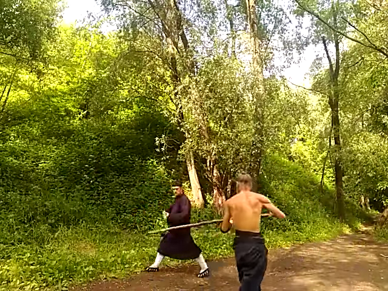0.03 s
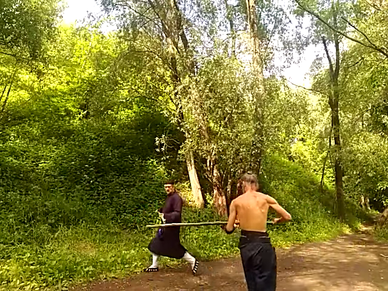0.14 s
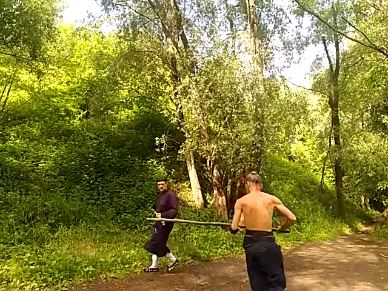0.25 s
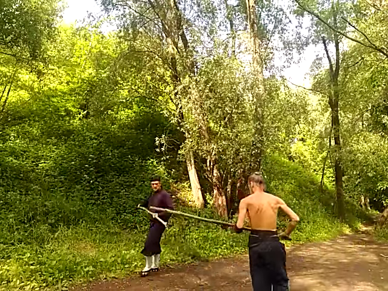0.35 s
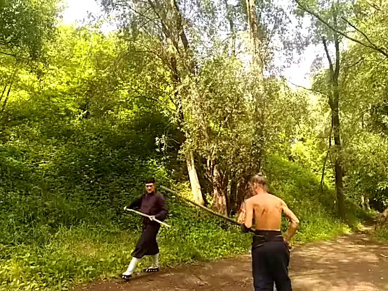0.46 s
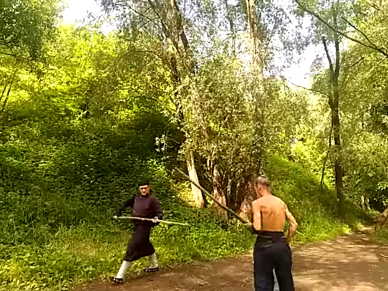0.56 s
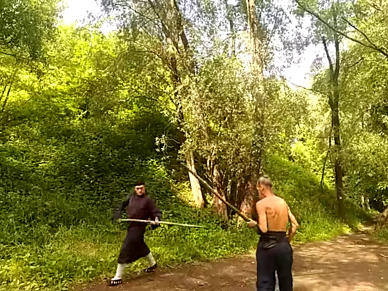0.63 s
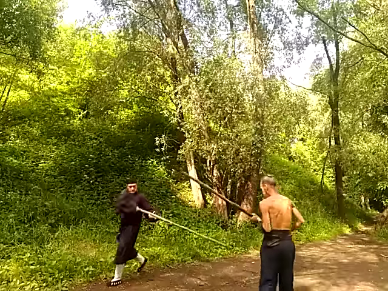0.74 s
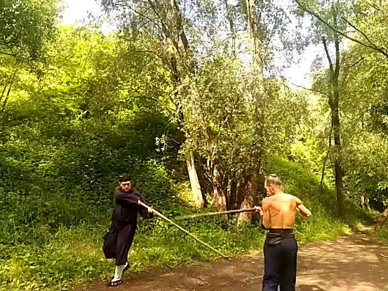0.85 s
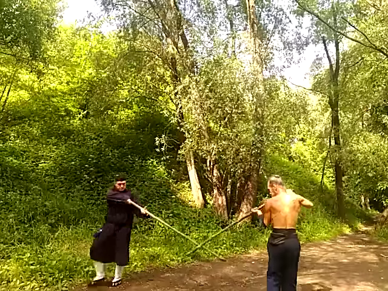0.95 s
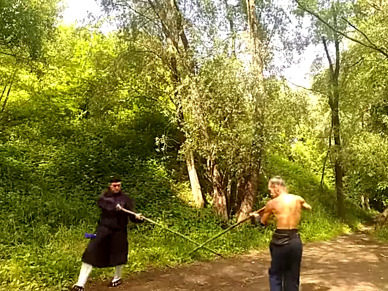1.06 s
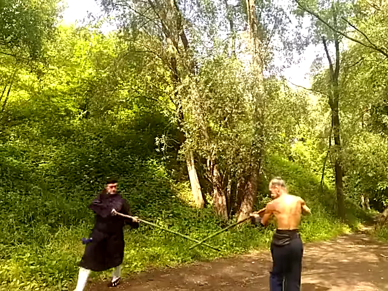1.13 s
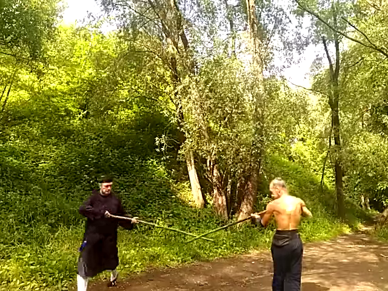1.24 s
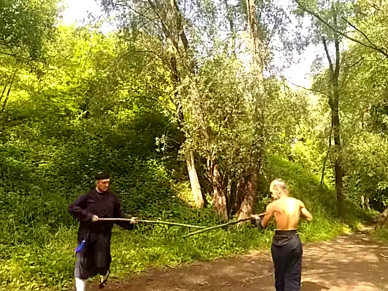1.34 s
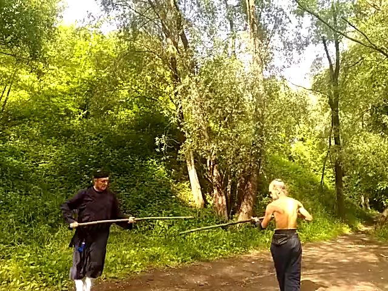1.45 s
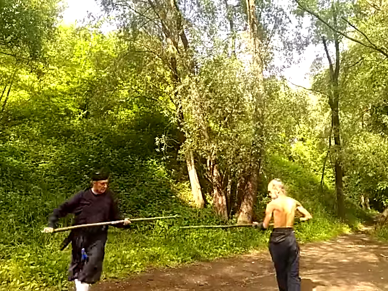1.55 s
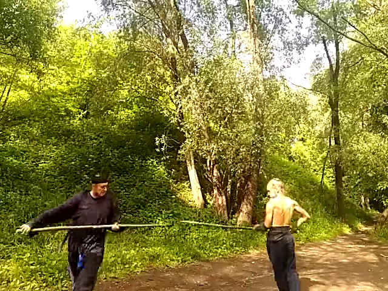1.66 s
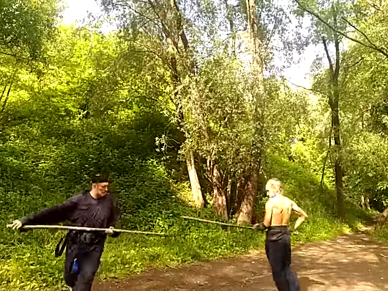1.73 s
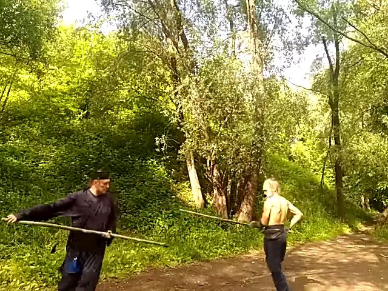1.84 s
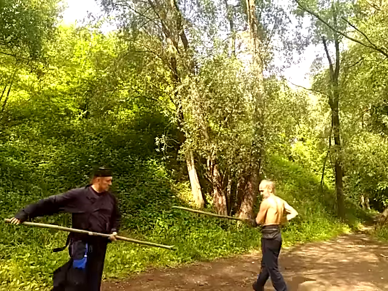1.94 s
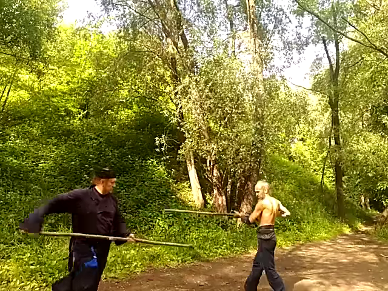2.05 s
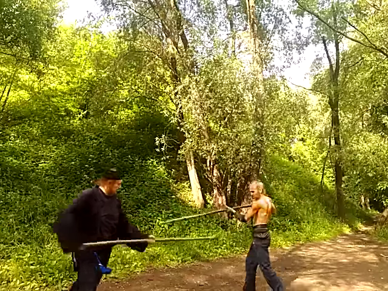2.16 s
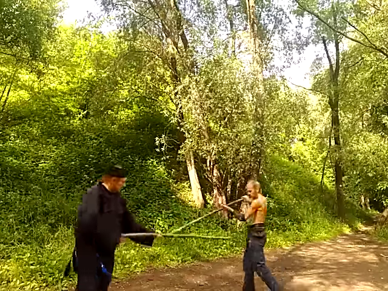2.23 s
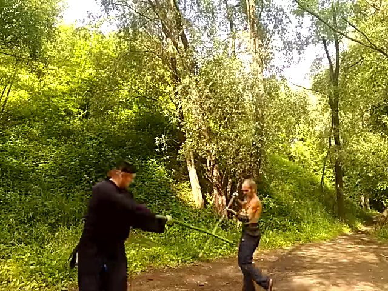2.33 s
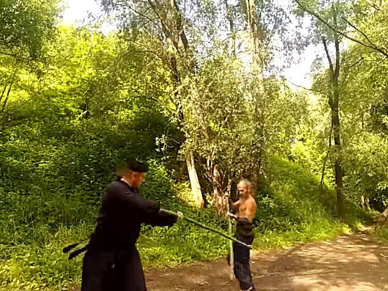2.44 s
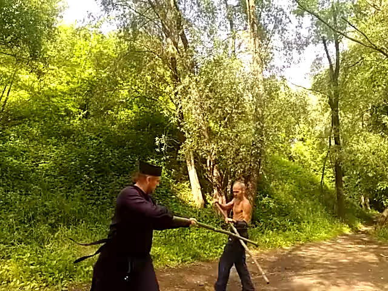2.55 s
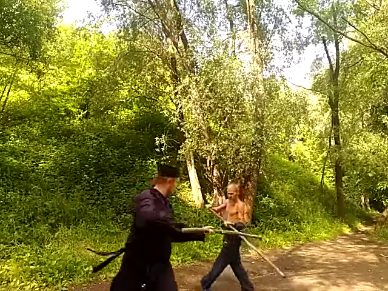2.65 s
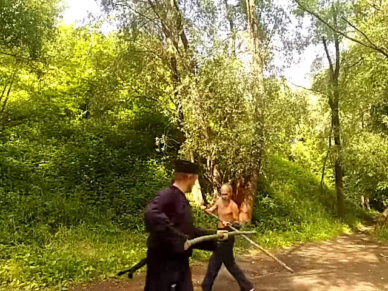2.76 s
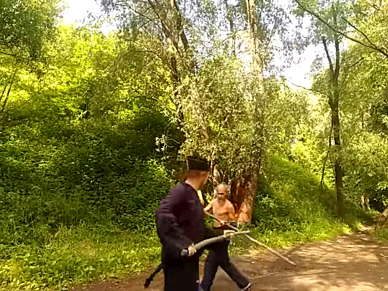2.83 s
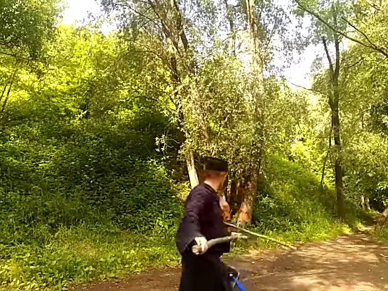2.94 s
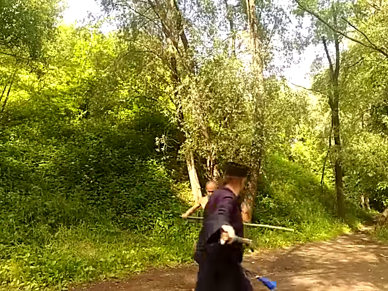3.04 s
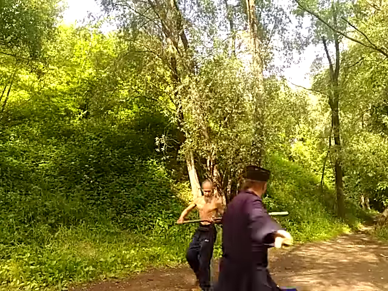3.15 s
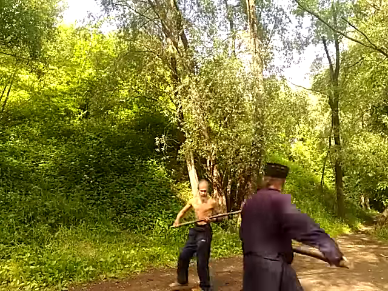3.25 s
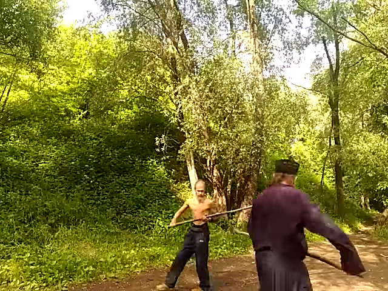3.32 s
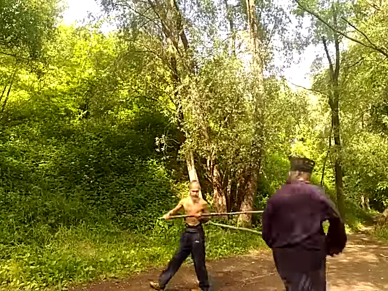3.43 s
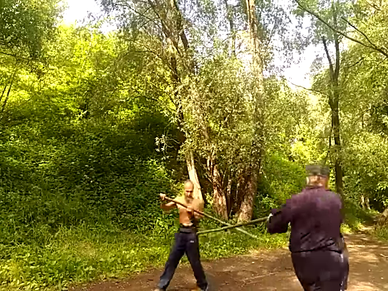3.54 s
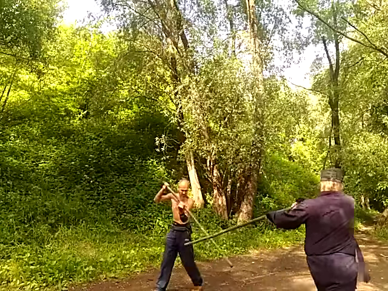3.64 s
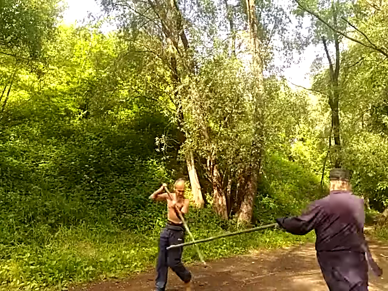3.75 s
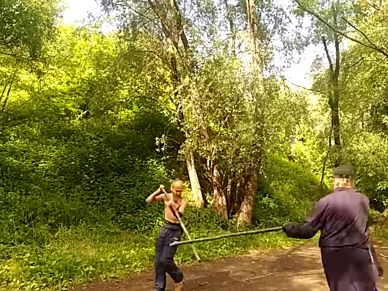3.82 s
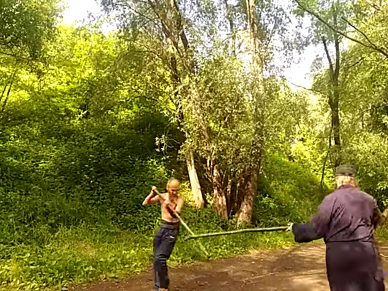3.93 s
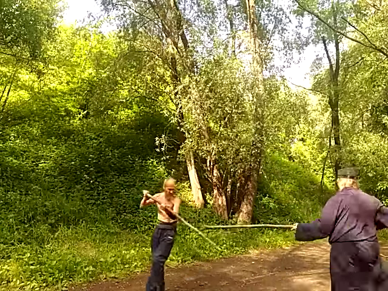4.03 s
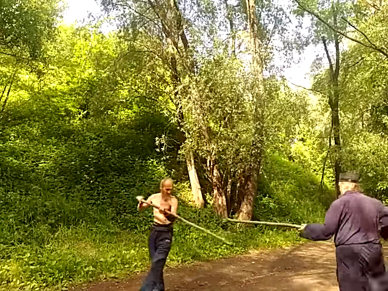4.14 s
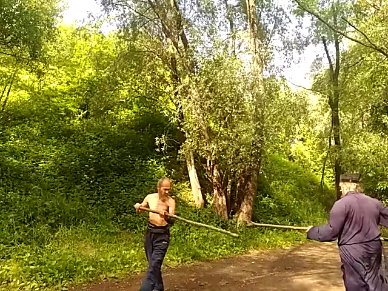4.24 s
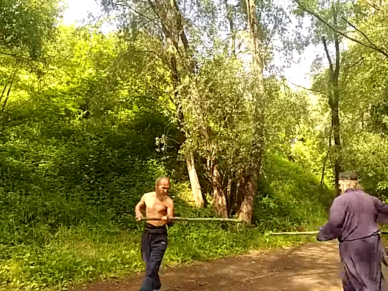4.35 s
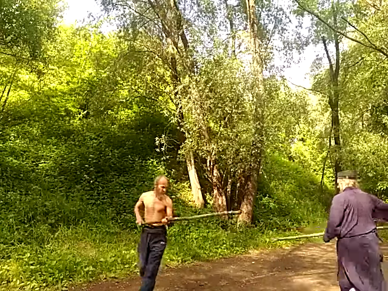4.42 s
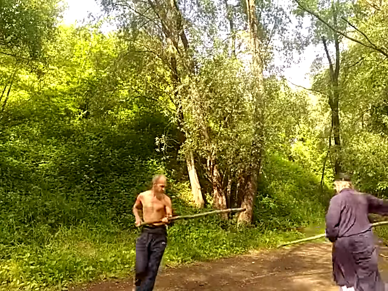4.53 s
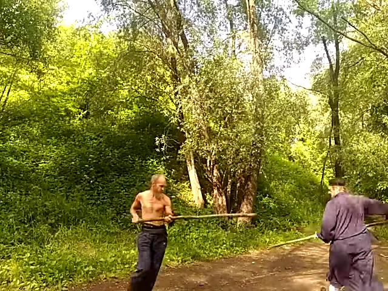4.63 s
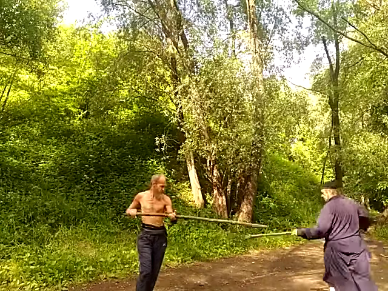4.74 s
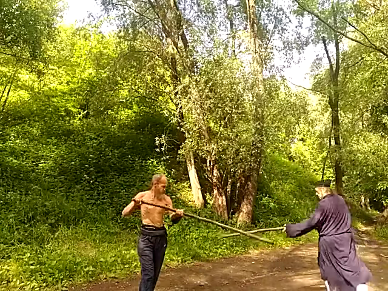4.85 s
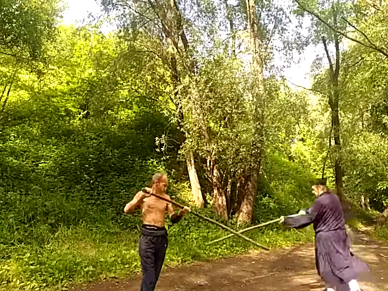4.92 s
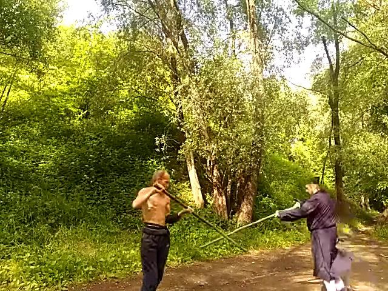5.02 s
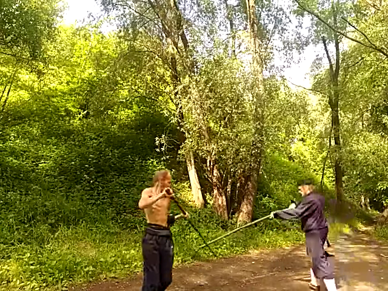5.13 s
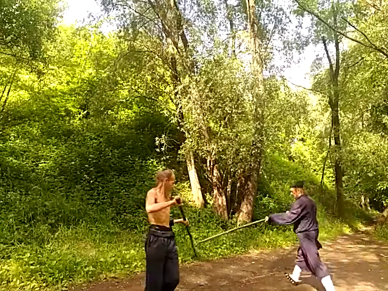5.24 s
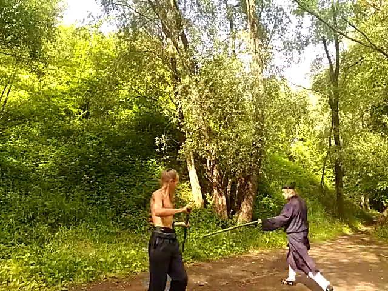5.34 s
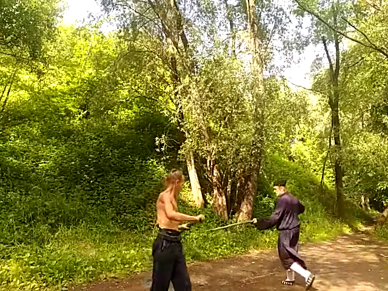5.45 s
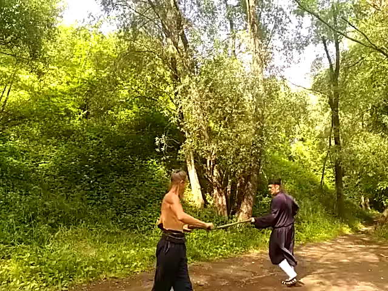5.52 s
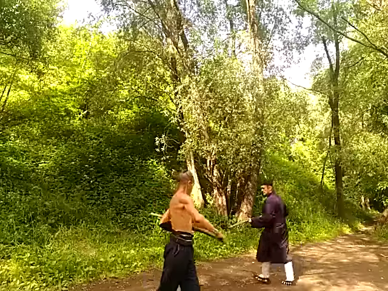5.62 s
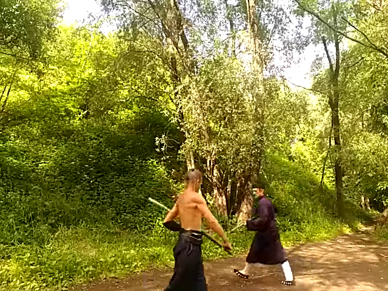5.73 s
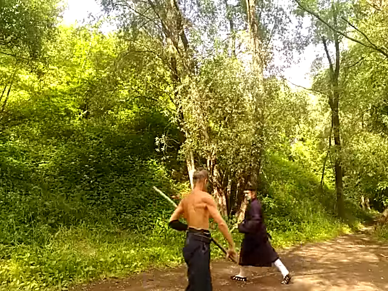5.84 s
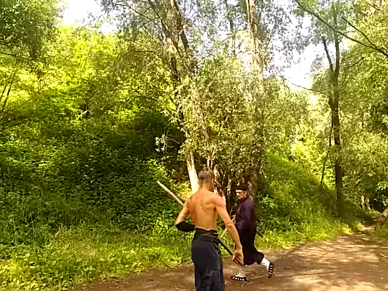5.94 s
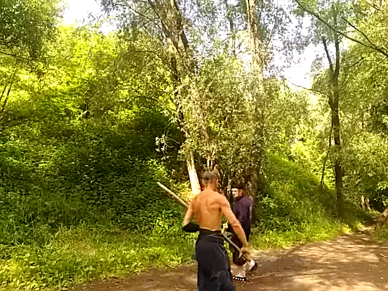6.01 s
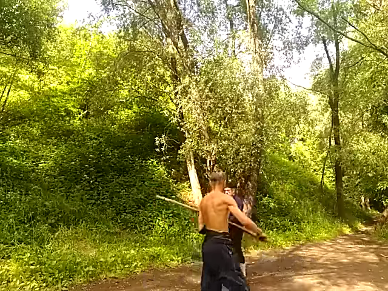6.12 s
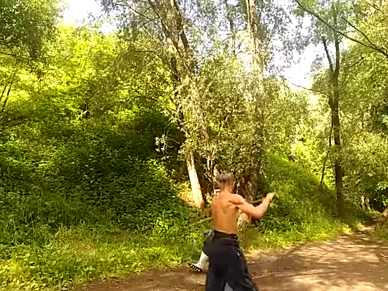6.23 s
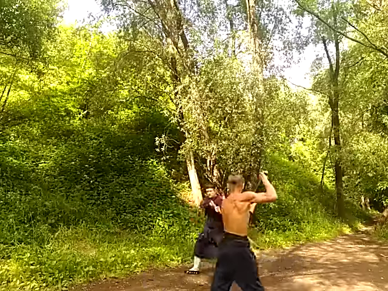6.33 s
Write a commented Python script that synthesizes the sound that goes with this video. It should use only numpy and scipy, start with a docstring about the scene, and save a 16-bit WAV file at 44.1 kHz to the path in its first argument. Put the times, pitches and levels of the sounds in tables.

```python
"""Two long wooden staffs clack hard four times and touch lightly a few times, on a dirt path between trees.
Each clack rings the bending modes of both staffs; trunks and a bank scatter it back as filtered noise.
Between blows shoes scuff (shaped grit noise) and thud (damped swings), and clothes swish (swelling hiss).
A faint outdoor hush and a low rumble lie beneath; the microphone is nearly mono, with a limiter
and a gain control that ducks after loud peaks."""
import sys
import numpy as np
from scipy import signal
from scipy.fft import rfft, irfft
from scipy.io import wavfile
from scipy.ndimage import uniform_filter1d, minimum_filter1d

SR = 44100
rng = np.random.default_rng(int(sys.argv[2]) if len(sys.argv) > 2 else 0)


def log_audio(samples):
    """Write samples as a 16-bit WAV file to the path given in sys.argv[1]."""
    # one column per channel
    frames = np.atleast_2d(samples).T
    # limit to full scale, then quantise
    limited = np.clip(frames, -1, 1)
    pcm = np.round(limited * 32767).astype(np.int16)
    wavfile.write(sys.argv[1], SR, pcm)


N = 281358  # samples

# bending modes of the pair of staffs; the contact point sets how strongly each is driven:
# pitch_hz, t60_s, then relative level_db at the contact points of clacks 1, 2, 3 and 4
STAFF_MODES = [(353, 0.12, -16, -34, -47, -69), (440, 0.066, -20, -21.5, -50, -36),
               (549, 0.098, -22.5, -42, -35, -26.5), (630, 0.043, -26, -14.5, -33.5, -21),
               (654, 0.076, -27, -13, -24.5, -48), (797, 0.042, -22.5, -49, -47.5, -42),
               (831, 0.058, -30, -32, -31, -19.5), (910, 0.07, -22, -27, -21.5, -26),
               (985, 0.06, -15, -7.5, -15.5, -14.5), (1116, 0.046, 4, -13.5, -15.5, -18.5),
               (1160, 0.045, 1, -0.5, -23, -16.5), (1240, 0.025, -40.5, -2.5, -8.5, -32),
               (1343, 0.061, -14, -20.5, -14.5, -17), (1500, 0.04, -17.5, -5.5, -7, -13.5),
               (1604, 0.044, -12.5, -13, -22, -18), (1740, 0.047, -21, -10, -14, -23),
               (1802, 0.042, -13, -21, -20.5, -12.5), (1880, 0.021, -8.5, -19.5, -23.5, -14),
               (2000, 0.036, -21.5, -11.5, -29, -37), (2123, 0.035, -28, -20.5, -44.5, -21.5),
               (2355, 0.035, -32, -24.5, -32.5, -26), (2563, 0.076, -25, -24, -39, -40),
               (3210, 0.026, -39.5, -46.5, -48.5, -32), (3183, 0.028, -36, -29, -23.5, -19.5),
               (3445, 0.051, -18.5, -39, -53, -49), (4015, 0.034, -41, -43.5, -34.5, -21.5)]
# spectrum of the crack where wood meets wood: freq_hz, relative level_db
CRACK_COLOUR = [(60, -29.5), (300, -3.5), (1000, 9.5), (2600, -3), (3700, -0.5), (4400, -1), (6000, -5.5),
                (8300, -3), (10000, -18), (12000, -35), (15000, -33)]


def undb(db):
    """Decibels to gain."""
    return 10 ** (np.asarray(db) / 20)


def unit(x):
    """Scale to rms 1."""
    return x / np.sqrt(np.mean(x ** 2))


def curve(rows):
    """Join (s, value) rows by straight lines."""
    return np.interp(np.arange(N) / SR, *np.transpose(rows))


def noise(colour, size=N):
    """Noise of rms 1 with a spectrum of (Hz, dB) points, joined along log frequency."""
    hz, db = np.transpose(colour)
    bin_hz = np.arange(size // 2 + 1) * SR / size
    gain = undb(np.interp(np.log(bin_hz + 1), np.log(hz), db))
    return unit(irfft(rfft(rng.standard_normal(size)) * gain, size))


def walk(rate):
    """Random levels, rate of them a second, joined by slopes; spread a little under 1."""
    hold = max(int(SR / rate), 1)
    levels = rng.standard_normal(N // hold + 1)
    return uniform_filter1d(np.repeat(levels, hold)[:N], hold)


def fade(t, t60):
    """Exponential decay of 60 dB in t60 seconds."""
    return np.exp(-np.log(1000) * t / t60)


def add(track, s, sound):
    """Mix a sound into the track at time s."""
    start = int(round(s * SR))
    track[start:start + len(sound)] += sound[:N - start]


def airy(colour, width_db=-10, above_hz=4300):
    """Noise at two close ports: the same on both, except that the treble differs a little."""
    mid, side = noise(colour), noise(colour)
    side = signal.sosfilt(signal.butter(8, above_hz, "high", fs=SR, output="sos"), side)
    return mid + undb(width_db) * np.array([side, -side])


def hush(level_db=3.0, rumble_db=-62.0, waver_db=0.46, rumble_follows=0.8):
    """Far leaves and town, with a low wavering rumble that takes a share in their rise and fall."""
    # distant hush before level_db is added: time_s, level_db
    swell_points = [(0.0, -58), (1.0, -55), (1.45, -54), (2.3, -55.5), (2.8, -57), (3.6, -57.5), (4.7, -59),
                    (5.6, -55), (6.38, -56.5)]
    # spectrum of the hush: freq_hz, relative level_db
    air_colour = [(15, -41), (25, -14), (81, 2.5), (145, -7.5), (275, -6), (432, -6), (627, -6), (697, -7),
                  (934, -6), (2190, -16), (3350, -15), (4380, -23), (7860, -28.5), (13400, -47),
                  (14500, -48)]
    # spectrum of the rumble: freq_hz, relative level_db
    rumble_colour = [(30, -31.5), (42, -12.5), (51, 4), (60, -6), (75, -7.5), (96, -1.5), (120, -21.5),
                     (250, -40.5), (1000, -82.5)]
    swell = curve(swell_points)
    air = airy(air_colour, width_db=-20.0) * undb(swell + level_db + waver_db * walk(8.8))
    rumble_swell = rumble_follows * (swell - swell.mean())
    rumble = noise(rumble_colour) * undb(rumble_db + rumble_swell + walk(5.9))
    return air + rumble


def swish(level_db=0.5, grain_db=1.5, flutter_db=1.9, rise_share=0.49, shape=1.9, rustle_db=-66.5):
    """Fine uneven friction hiss that swells as each swing speeds up and dies as it slows."""
    # swings of a sleeve, robe or sliding shoe: fastest_s, level_db before level_db is added, length_s
    swings = [(0.205, -58.5, .32), (0.39, -58.5, .14), (0.736, -57, 0.14), (0.882, -50.5, .11),
              (0.98, -56, 0.38), (1.195, -52, 0.051), (1.32, -53.5, 0.2), (1.558, -52, 0.32),
              (1.853, -55.5, 0.18), (2.26, -53, 0.15), (2.365, -40, 0.14), (2.522, -51, 0.12),
              (2.76, -54.5, 0.12), (2.94, -50, 0.3), (3.285, -60.5, 0.091), (3.545, -65, 0.12),
              (3.685, -58.5, .16), (3.8, -62, .1), (4.212, -63, 0.054), (4.379, -54.5, .08),
              (4.726, -61.5, 0.21), (5.0, -54, 0.18), (5.18, -61, 0.22), (5.454, -56, 0.17),
              (5.74, -53, 0.2), (6.043, -57, 0.17), (6.18, -61, 0.17), (6.327, -54.5, 0.16)]
    # spectrum of rubbing cloth through a microphone that resonates near 8 kHz: freq_hz, relative level_db
    swish_at_mic_colour = [(500, -11), (3000, -17), (4500, -11), (6000, -5.5), (7600, -0.5), (8200, 3),
                           (8700, -4), (10500, -10.5), (12000, -19), (14500, -23)]
    t = np.arange(N) / SR
    power = undb(rustle_db) ** 2  # clothes never quite come to rest
    for s, db, length in swings:
        # rise_share of the length is spent speeding up
        away = np.abs(t - s) / (length * np.where(t < s, rise_share, 1 - rise_share))
        swing = undb(db) * np.exp(-away ** shape)  # shape 2 is a bell, more has a flatter top
        power = power + swing ** 2
    grain = unit(undb(grain_db * walk(900) + flutter_db * walk(50)))
    return undb(level_db) * np.sqrt(power) * grain * airy(swish_at_mic_colour)


def scrapes(grain_db=2.0, stutter_db=2, grind_hz=2800):
    """A sole bites quickly and stutters out over grains of grit; weight on it brings out a lower grind."""
    # soles scraping over grit: start_s, level_db, length_s, weight_db (weight on the sole, as low grind)
    scuffs = [(0.768, -49, .022, -18), (1.012, -46, 0.018, 2), (1.126, -33.5, 0.029, -11),
              (1.248, -41.5, 0.063, 2), (1.306, -44.5, 0.03, 3), (2.131, -43, 0.024, 3),
              (2.156, -34, 0.025, 3.5), (2.181, -33, 0.032, -5), (2.201, -40.5, 0.027, -11),
              (2.527, -44.5, .035, -8), (4.992, -46, 0.04, 1), (5.256, -48, 0.014, 0),
              (5.323, -52.5, .015, -2), (5.691, -46, .022, 0)]
    # spectrum of the grit: freq_hz, relative level_db
    grit_colour = [(150, -5.5), (600, 0.5), (1700, -1.5), (2800, -11.5), (4500, -3.5), (7000, 3),
                   (9500, 0.5), (11000, -15.5), (14500, -21)]
    push, press = np.zeros(N), np.zeros(N)
    t = np.arange(SR // 4) / SR
    for s, db, length, weight_db in scuffs:
        bite = undb(db) * (1 - np.exp(-t / .0012)) * np.exp(-(t / length) ** 2)
        add(push, s, bite)
        add(press, s, undb(weight_db) * bite)
    grit = airy(grit_colour)
    grind = signal.sosfiltfilt(signal.butter(3, grind_hz, fs=SR, output="sos"), grit)
    stutter = unit(undb(grain_db * walk(1500) + stutter_db * walk(200)))
    return (push * (grit - grind) + press * grind) * stutter


def thuds(grit=0.34):
    """One heavily damped swing with a rough noise; in steps and cloth the roughness is their give."""
    # footfalls, snaps of cloth and the low push of the microphone overloading on a hard blow:
    # start_s, level_db, pitch_hz, t60_s of the roughness
    low_sounds = [(1.326, -30, 232, 0.1), (1.486, -39, 350, 0.057), (1.815, -45, 158, .06),
                  (2.159, -38, 267, 0.08), (2.2387, -14.5, 440, 0.0055), (2.245, -32, 485, .005),
                  (2.47, -24, 191, .02), (2.720, -37.5, 525, 0.078), (3.647, -38.5, 560, .04),
                  (3.742, -30.5, 121.6, .02), (4.373, -44, 297.6, 0.052), (4.991, -38, 320, 0.082),
                  (5.405, -41, 170, 0.036), (5.7, -41, 374, 0.11), (5.967, -38.5, 390, 0.052)]
    out, t = np.zeros(N), np.arange(SR // 4) / SR
    for s, db, hz, t60 in low_sounds:
        rough = noise([(hz / 4, -12), (hz, 0), (hz * 2, -8), (hz * 8, -40)], size=len(t))
        swing = np.sin(2 * np.pi * hz * t) * fade(t, 4 / hz)  # down 60 dB in four cycles
        add(out, s, undb(db) * (swing + grit * rough * fade(t, t60)))
    return out


def staff_ring(t, mode_gain, radiate_hz=300):
    """Damped bending modes; a thin staff radiates little bass."""
    hz, t60 = np.array(STAFF_MODES).T[:2, :, None]
    ring = mode_gain @ (fade(t, t60) * np.sin(2 * np.pi * hz * t))
    return signal.sosfilt(signal.butter(2, radiate_hz, "high", fs=SR, output="sos"), ring)


def touches(tick_t60=.04, focus_db=22):
    """A light contact drives the modes around one pitch, with a small tick."""
    # wood on wood or hand: start_s, ring peak level_db, strongest pitch_hz, tick_db relative to that peak
    contacts = [(1.124, -30, 1700, -20), (2.514, -26.5, 990, -24), (3.921, -37, 685, -30),
                (5.258, -32, 880, -20), (5.321, -35.5, 450, -14)]
    out, t = np.zeros(N), np.arange(SR // 4) / SR
    hz = np.array(STAFF_MODES)[:, 0]
    for s, db, centre_hz, tick_db in contacts:
        octaves_off = np.abs(np.log2(hz / centre_hz))
        mode_db = -focus_db * octaves_off + 2 * rng.standard_normal(len(hz))
        ring = staff_ring(t, rng.choice([-1, 1], len(hz)) * undb(mode_db))
        tick = undb(tick_db) * noise(CRACK_COLOUR, size=len(t)) * fade(t, tick_t60)
        add(out, s, undb(db) * (ring / np.abs(ring).max() + tick))
    return out


def trees(t60=0.64, woody_hz=1250, woody_width_hz=320, woody_t60=0.6, build_s=0.0037, clump_db=3,
          bank_s=0.038, bank_db=2, bank_t60=0.095):
    """Weak returns from trunks and leaves merge into a clumpy tail; the bank adds one smeared echo."""
    # spectrum of the returns: freq_hz, relative level_db
    echo_colour = [(150, -36), (400, -8.5), (800, -5.5), (1200, 1), (1600, -1.5), (2000, -5), (2600, -12),
                   (3400, -13), (4500, -26.5), (9000, -25.5), (15000, -51)]
    t = np.arange(SR * 3 // 4) / SR
    clumps = undb(clump_db * walk(200)[:len(t)])
    scatter = unit(noise(echo_colour, size=len(t)) * clumps)
    # the woody middle has a decay of its own
    woody = signal.lfilter(*signal.iirpeak(woody_hz, woody_hz / woody_width_hz, fs=SR), scatter)
    tail = woody * fade(t, woody_t60) + (scatter - woody) * fade(t, t60)
    tail = tail * (1 - np.exp(-t / build_s))
    bank = noise(echo_colour, size=len(t)) * (t > bank_s) * fade(np.abs(t - bank_s), bank_t60)
    return tail + undb(bank_db) * bank


def clacks():
    """Each blow rings the staffs, cracks at the surface, rebounds once and comes back from the trees."""
    # start_s, ring level_db on top of the mode levels, rebound_s after the blow, rebound_db relative to it,
    # surface crack_db, crack_t60_s, echo_db from the trees
    blows = [(1.0790, 1, .00132, 0, -13.5, 0.028, -29), (2.4676, 1.5, 0.0037, -8, -22, 0.045, -36.5),
             (3.7428, 1.5, .00438, -19, -25, 0.054, -38), (5.1100, 1.5, .00458, -12, -15, 0.017, -34.5)]
    out, t = np.zeros(N), np.arange(SR // 4) / SR
    sense = (-1) ** np.arange(len(STAFF_MODES))  # neighbouring modes swing in opposite senses at the far tip
    contact_points = np.array(STAFF_MODES).T[2:]
    for row, mode_db in zip(blows, contact_points):
        s, db, rebound_s, rebound_db, crack_db, crack_t60, echo_db = row
        # the high modes lie too close and die too fast to be told apart, so noise stands for them
        crack = undb(crack_db) * noise(CRACK_COLOUR, size=len(t)) * fade(t, crack_t60)
        blow = undb(db) * staff_ring(t, sense * undb(mode_db)) + crack
        add(out, s, blow)
        add(out, s, undb(rebound_db) * np.interp(t - rebound_s, t, blow, left=0))
        add(out, s, undb(echo_db) * trees())
    return out


def scene():
    """Everything reaches the microphone from the front."""
    return clacks() + touches() + thuds() + scrapes() + swish() + hush()


def gain_control(x, above_db=-24.5, share=.17, attack_s=0.09, recover_db_per_s=3):
    """Each loud peak loses a share of its excess in dB; the gain creeps back at a steady rate."""
    recovery = recover_db_per_s * np.arange(N) / SR
    excess_db = 20 * np.log10(np.maximum(np.abs(x).max(axis=0) / undb(above_db), 1))
    duck_db = np.maximum.accumulate(share * excess_db + recovery) - recovery
    step = 1 / (attack_s * SR)
    smooth_duck_db = signal.lfilter([step], [1, step - 1], duck_db)
    return x * undb(-smooth_duck_db)


def record(dry):
    """A fast limiter holds down the clacks, the gain ducks after them; both ends of the spectrum are cut."""
    ceiling, size, top_hz = .8, 67, 14400  # full scale is 1; limiter window in samples
    x = signal.sosfilt(signal.butter(4, 36, "high", fs=SR, output="sos"), dry)
    gain = ceiling / np.maximum(np.abs(x).max(axis=0), ceiling)
    gain = uniform_filter1d(minimum_filter1d(gain, size), size)
    levelled = gain_control(x * gain)
    return signal.sosfilt(signal.ellip(8, .2, 70, top_hz, fs=SR, output="sos"), levelled)


dry = scene()
out = record(dry)
log_audio(out)
```